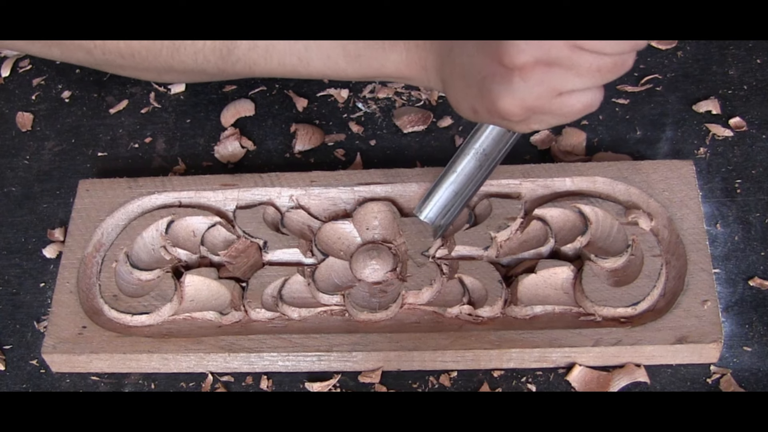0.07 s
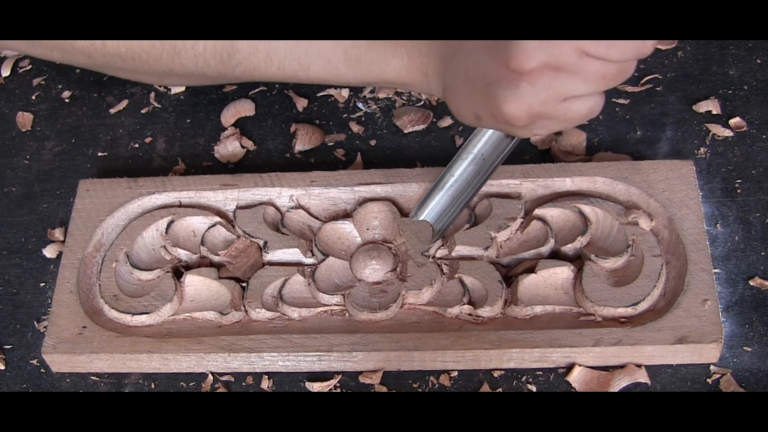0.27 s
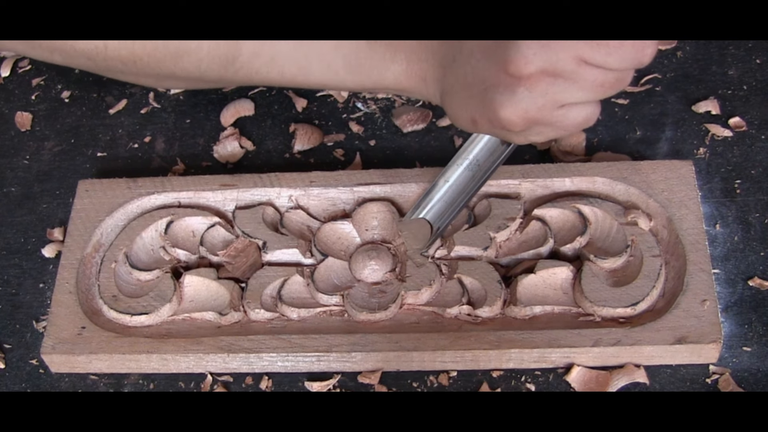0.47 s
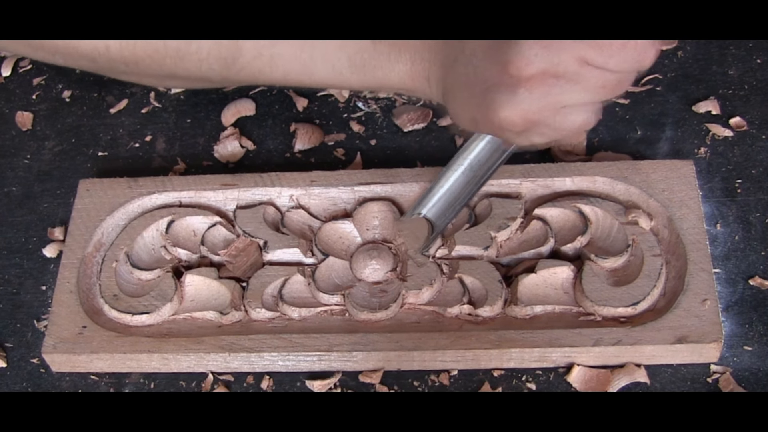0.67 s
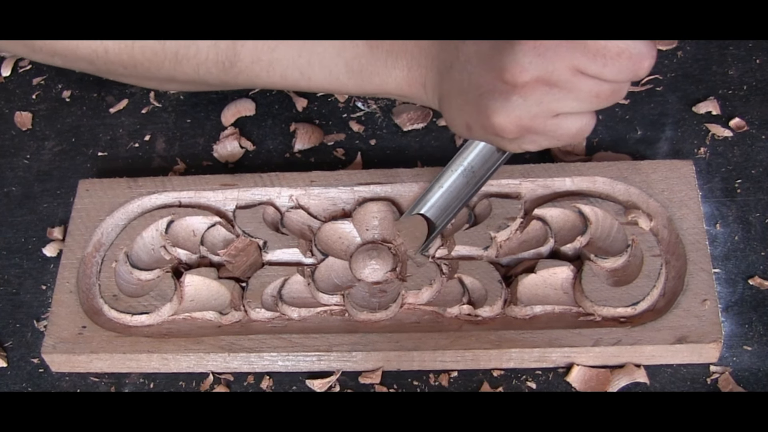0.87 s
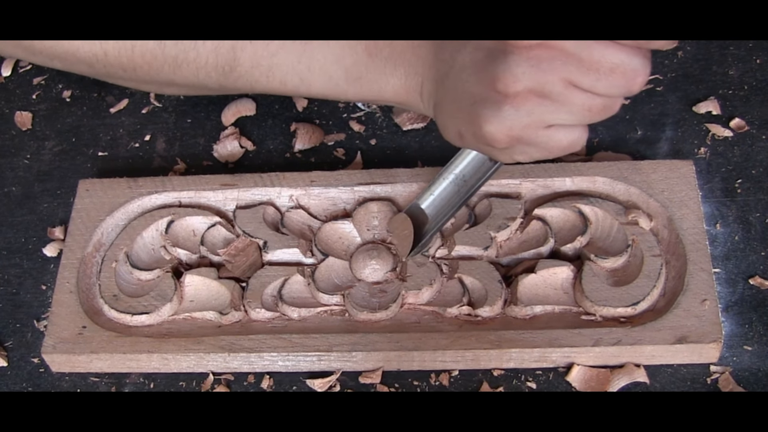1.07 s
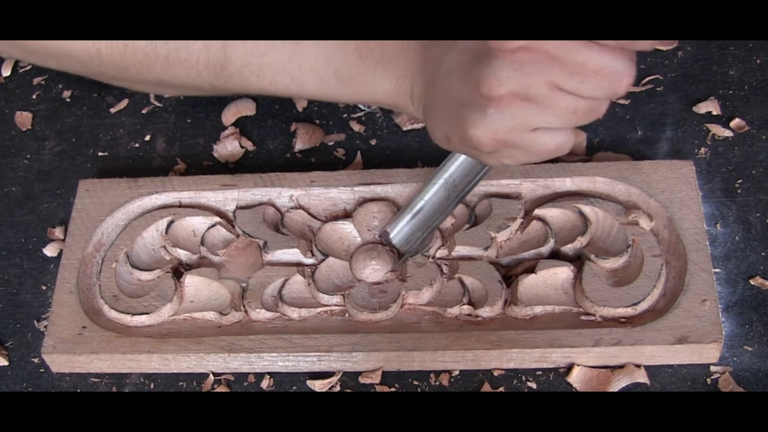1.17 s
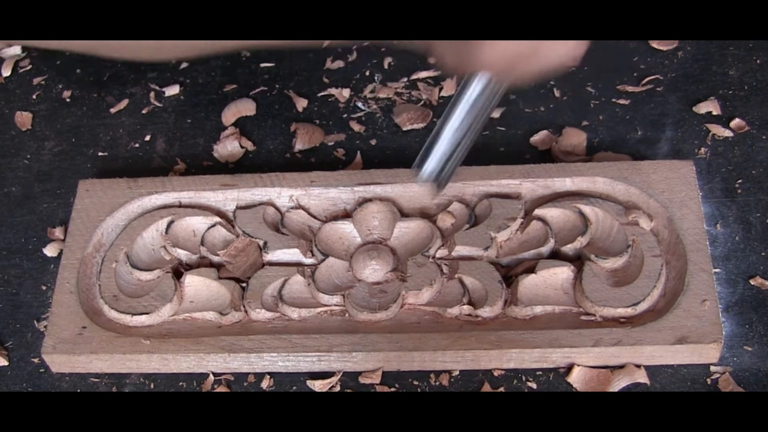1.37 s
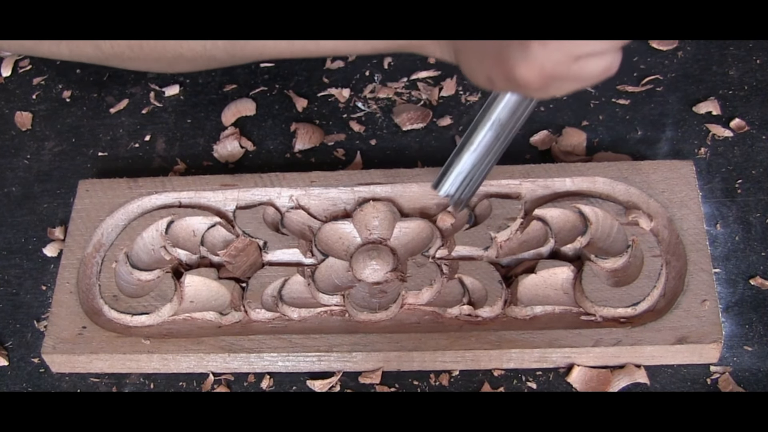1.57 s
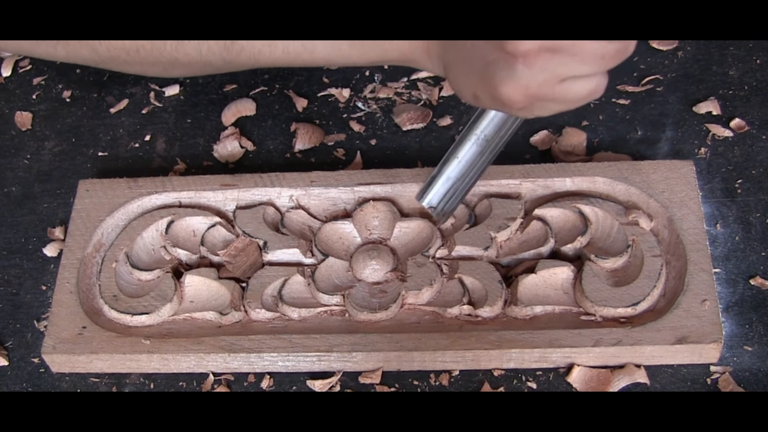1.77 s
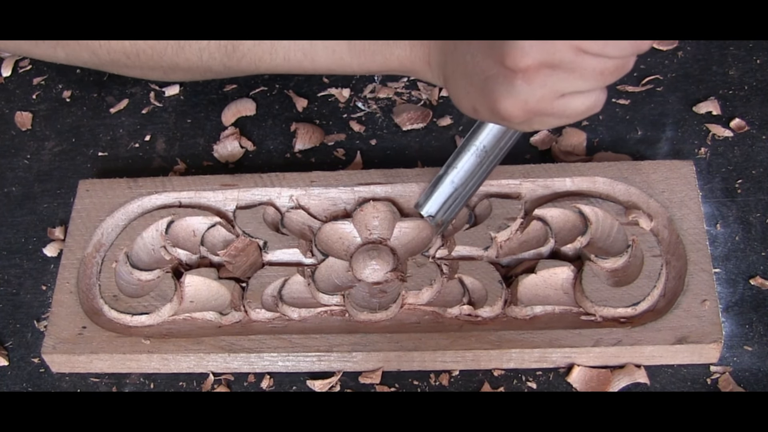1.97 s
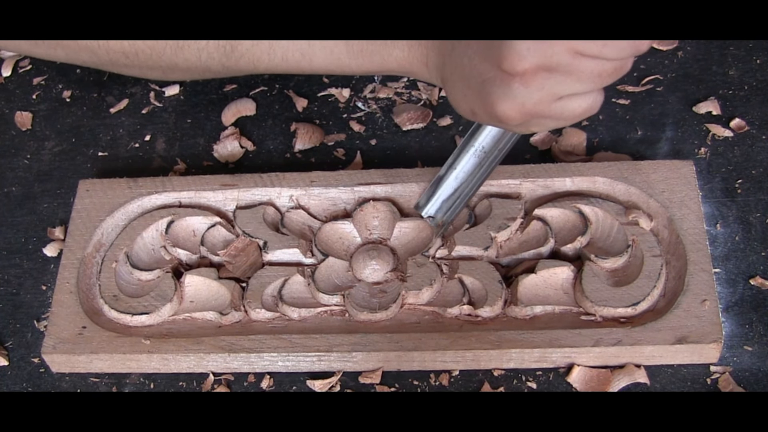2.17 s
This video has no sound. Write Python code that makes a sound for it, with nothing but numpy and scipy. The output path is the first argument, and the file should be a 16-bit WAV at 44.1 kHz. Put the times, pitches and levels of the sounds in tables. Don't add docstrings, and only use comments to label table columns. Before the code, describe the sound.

A wooden mallet knocks a gouge into a hardwood panel five times in a quick even run, close up in a small workshop; then the tool lifts with a crackly tick, sets down softly, and dull nudges follow.

```python
import sys
import numpy as np
from scipy import signal
from scipy.io import wavfile

SR = 44100
rng = np.random.default_rng(int(sys.argv[2]) if len(sys.argv) > 2 else 0)


def materialize(psi):
    bounded = np.clip(np.atleast_2d(psi).T, -1, 1)
    quanta = np.round(bounded * 32767).astype(np.int16)
    wavfile.write(sys.argv[1], SR, quanta)


def gain_from_db(level_db):
    decades = np.asarray(level_db, float) / 20
    return 10 ** decades


N = 97020
LEAD = SR // 4
FACE_LOW_HZ, FACE_TOP_HZ = 175, 4900
ROOM_BUILD_S, ROOM_ALIKE = 0.006, 0.62


def rms_one(x):
    return x / np.sqrt(np.mean(x ** 2) + 1e-20)


def at_hz(points, hz):
    table_hz, values = np.array(points).T
    return np.interp(np.log(hz), np.log(table_hz), values)


def ring(clicks, hz, t60_s):
    r = gain_from_db(-60 / (t60_s * SR))
    w = 2 * np.pi * hz / SR
    return signal.lfilter([0, np.sin(w)], [1, -2 * r * np.cos(w), r * r], clicks + 1e-18)


def band(x, low_hz, high_hz):
    sos = signal.butter(2, [low_hz, min(high_hz, 0.45 * SR)], "band", fs=SR, output="sos")
    return signal.sosfilt(sos, x)


def dying(t60_s, size):
    return gain_from_db(-60 * np.arange(size) / SR / t60_s)


def add(track, s, sound):
    i = int(s * SR) + LEAD
    track[..., i:i + sound.shape[-1]] += sound[..., :track.shape[-1] - i]


def banded(size, gain, alike):
    out = 0
    edges_hz = 28 * 2 ** np.arange(0, 9.6, 0.5)
    white = rng.standard_normal((2, 2, size))
    for k, (low_hz, high_hz) in enumerate(zip(edges_hz, edges_hz[1:])):
        mid, side = band(white[k % 2], low_hz, high_hz)
        hz = np.sqrt(low_hz * high_hz)
        c = np.clip(alike(hz), 0, 1)
        out = out + gain(hz) * (np.sqrt(1 + c) * mid + np.sqrt(1 - c) * side * [[1], [-1]])
    return out


def build_up(size):
    return 1 - np.exp(-(np.arange(size) / SR / ROOM_BUILD_S) ** 2)


def struck(modes, size=SR // 4):
    click = np.arange(size) == 0
    return sum(gain_from_db(db) * ring(click, hz, t60_s) for hz, db, t60_s in modes)


def tilt(hz, bass_db, treble_db):
    return at_hz([(500, bass_db), (1200, 0), (2500, 0), (4000, treble_db)], hz)


# start in seconds, peak in dB, bass tilt in dB, treble tilt in dB, late echo in dB.
BLOWS = [
    (0.2308, 1, -3, -4.5, -37.5),
    (.4903, 3, -3.5, 3, -24),
    (0.7174, 1.5, -6.5, 9.5, -15),
    (0.9471, 1, -4, 7.5, -18),
    (1.1670, 1, 4, -0.5, -38),
]
# start in seconds, peak, bass tilt, treble tilt, late echo in dB.
EARLIER_BLOW = (-.09, -4.5, 0, 11, -37)
ALL_BLOWS = [EARLIER_BLOW] + BLOWS
# frequency in Hz, level in dB, t60 in seconds.
WOOD = [(172, -37, 0.094), (285, -32.5, .05), (401.2, -21.5, 0.088), (560, -21.5, .04), (798, -16, .03),
        (993, -17.5, 0.034), (1116, -15, .03), (1358, -14, 0.066), (1711, -16.5, 0.026),
        (1963, -12.5, .025), (2346, -6.5, 0.019), (2826, -16, 0.013), (3738, -19.5, 0.013),
        (3297, -19, 0.013)]
# frequency in Hz, level in dB, t60 in seconds.
SHANK = [(200.4, -35.5, 0.55), (418, -34.5, 0.3), (573, -36, .25), (1135, -35, 0.27), (1727, -40, .25),
         (2458, -39, .25), (4330, -50.5, 0.11), (6500, -63, .15)]
CONTACTS_S = (0, .0011, .0024, .0042)
CONTACTS_DB = (-2.5, -3, -5.5, -12)
MODE_SPREAD_DB, DETUNE = 2.5, 0.025
CRACK_DB, CRACK_T60_S, CRACK_LOW_HZ, CRACK_TOP_HZ = -26, 0.012, 4434, 11000
BENCH_HZ, BENCH_DB, BENCH_T60_S = 80, -45, 0.55


def mallet():
    out, size = np.zeros(N + LEAD), SR // 2
    t = np.arange(size) / SR
    contacts = (np.array(CONTACTS_S) * SR).astype(int)
    for s, db, bass_db, treble_db, _ in ALL_BLOWS:
        luck = rng.standard_normal((len(WOOD), len(CONTACTS_S) + 1))
        crack = dying(CRACK_T60_S, size) * band(rng.standard_normal(size), CRACK_LOW_HZ, CRACK_TOP_HZ)
        crack = gain_from_db(CRACK_DB + treble_db) * crack
        body = 0
        for (hz, mode_db, t60_s), (bend, *push) in zip(WOOD, luck):
            clicks = np.zeros(size)
            clicks[contacts] = gain_from_db(np.add(CONTACTS_DB, MODE_SPREAD_DB * np.array(push)))
            mode = ring(clicks, hz * (1 + DETUNE * bend), t60_s)
            body = body + gain_from_db(mode_db + tilt(hz, bass_db, treble_db)) * mode
        for hz, ring_db, t60_s in SHANK:
            linger = dying(t60_s, size) * ring(rng.standard_normal(size), hz, 0.078)
            body = body + gain_from_db(ring_db - 20 + 2.6 * rng.standard_normal()) * linger
        body = band(band(body, FACE_LOW_HZ, FACE_TOP_HZ), FACE_LOW_HZ, 2 * FACE_TOP_HZ)
        swell = 1 - np.exp(-t / 0.02)
        thud = gain_from_db(BENCH_DB) * swell * struck([(BENCH_HZ, 0, BENCH_T60_S)], size)
        add(out, s, gain_from_db(db) * (body + crack + thud))
    return out


# high mode in Hz, its level in dB, low mode in Hz, its level in dB.
BITES = [(2270, -16, 1130, -20), (2206, -7.5, 1179, -12.5), (2282, -9, 1150, -16), (3826, -10, 1500, -14.5),
         (3684, -11, 770, -22.5), (3027, -9.5, 330, -20.5)]
# start in seconds,
# frequency in Hz, level in dB, t60 in seconds.
SINGLE_RINGS = [(1.168, 557, -10.5, 0.04), (1.1675, 2100, -15, .025), (.9475, 3200, -19.5, 0.016),
                (0.87, 4550, -53, .15), (0.79, 4000, -50, .15), (1.2, 2230, -36.5, .02),
                (1.654, 2200, -53.5, .08), (1.6392, 2700, -43, 0.017), (1.6394, 5000, -36, 0.011),
                (1.643, 3105, -46, 0.034), (1.732, 1950, -61, 0.09)]
BITE_HIGH_T60_S, BITE_LOW_T60_S = 0.035, 0.058


def bites():
    out = np.zeros(N + LEAD)
    for (s, *_), (high_hz, high_db, low_hz, low_db) in zip(ALL_BLOWS, BITES):
        pair = struck([(high_hz, high_db, BITE_HIGH_T60_S), (low_hz, low_db, BITE_LOW_T60_S)])
        add(out, s + 0.0004, band(band(pair, FACE_LOW_HZ, FACE_TOP_HZ), FACE_LOW_HZ, FACE_TOP_HZ))
    for s, hz, db, t60_s in SINGLE_RINGS:
        add(out, s, band(struck([(hz, db, t60_s)]), hz / 2, hz * 2))
    return out


# frequency in Hz, t60 in seconds.
ROOM_T60 = [(60, .5), (160, 0.33), (420, 0.2384), (1100, 0.1721), (2900, 0.1551), (7700, .085)]
# frequency in Hz, level in dB.
ROOM_COLOUR = [(50, -22.5), (120, -12), (330, -13.5), (600, 1), (1300, 5.5), (2600, -4.5), (5000, -23),
               (14000, -62)]
# level in dB, treble tilt in dB.
ECHOES = [(2, 3.5), (0.5, -5.5), (-2.5, 2.5), (-1, 1.5), (-4.5, 3.5), (-6, 2)]
ROOM_DB, LATE_STRETCH = -16.5, 2.5
RECOVER_DB, RECOVER_S = 14.5, 0.087


def blow_tails():
    out, size = np.zeros((2, N + LEAD)), SR // 2
    t = np.arange(size) / SR
    recover = gain_from_db(RECOVER_DB * np.minimum(t / RECOVER_S, 1))
    for (s, db, bass_db, _, late_db), (room_db, treble_db) in zip(ALL_BLOWS, ECHOES):
        def gain(hz):
            t60_s = at_hz(ROOM_T60, hz)
            fall = recover * dying(t60_s, size) + gain_from_db(late_db) * dying(LATE_STRETCH * t60_s, size)
            return gain_from_db(at_hz(ROOM_COLOUR, hz) + tilt(hz, bass_db, treble_db)) * fall
        echoes = build_up(size) * banded(size, gain, lambda hz: ROOM_ALIKE)
        add(out, s, gain_from_db(db + room_db + ROOM_DB) * echoes)
    return out


# frequency in Hz, density in dB per Hz.
HUM = [(18, -40), (30, -14.5), (118, -1.5), (233, -4), (437, -7), (988, -10), (1160, -14), (1720, -13.5),
       (16000, -33)]
# frequency in Hz, left-right likeness from 0 to 1.
HUM_ALIKE = [(60, 0.56), (380, 0.77), (2380, 0.05), (15000, -0.01)]
HUM_DB = -61.5
BUMP_HZ, BUMP_T60_S, BUMP_DB = 209.4, 0.017, -69


def hum():
    size = N + LEAD
    bump = rms_one(band(ring(rng.standard_normal(size), BUMP_HZ, BUMP_T60_S), 120, 300))
    air = rms_one(banded(size, lambda hz: gain_from_db(at_hz(HUM, hz)), lambda hz: at_hz(HUM_ALIKE, hz)))
    return gain_from_db(BUMP_DB) * bump + gain_from_db(HUM_DB) * air


# start in seconds, steel in dB, wood knock in dB, fibre crackle in dB.
TICKS = [
    (1.3391, -27, -36.5, -23.5),
    (1.6397, -60, -57, -27),
]
# frequency in Hz, level in dB, t60 in seconds.
STEEL = [(3943, -3, 0.028), (5830, -6, 0.0097), (8500, -0.5, 0.002), (11160, -1, 0.0023)]
# frequency in Hz, level in dB, t60 in seconds.
KNOCK = [(446, 0.5, 0.025), (592, 6.5, 0.024), (1310, 5.5, 0.0093)]
CRACKLE_PER_S, CRACKLE_T60_S, CRACKLE_LOW_HZ, CRACKLE_TOP_HZ = 2100, 0.09, 2160, 5900


def gouge():
    out, size = np.zeros(N + LEAD), SR // 8
    for s, steel_db, knock_db, crackle_db in TICKS:
        snaps = (rng.random(size) < CRACKLE_PER_S / SR) * rng.laplace(0, 1, size)
        snaps = snaps * dying(CRACKLE_T60_S, size)
        crackle = band(snaps, CRACKLE_LOW_HZ, CRACKLE_TOP_HZ) + 0.18 * band(snaps, CRACKLE_TOP_HZ, 18000)
        add(out, s, gain_from_db(steel_db) * struck(STEEL))
        add(out, s + 0.00193, gain_from_db(knock_db) * band(struck(KNOCK), 314, 2700))
        add(out, s, gain_from_db(crackle_db - 3) * crackle)
    return out


# start in seconds, level in dB.
SNAPS = [
    (1.6392, -33),
    (1.6428, -35.5),
    (1.3392, -30),
    (2.1, -60),
]
SNAP_T60_S, SNAP_LOW_HZ, SNAP_TOP_HZ = 0.01, 1430, 8600


def fibres():
    out, size = np.zeros(N + LEAD), SR // 20
    for s, db in SNAPS:
        snap = band(rng.standard_normal(size), SNAP_LOW_HZ, SNAP_TOP_HZ)
        add(out, s, gain_from_db(db) * dying(SNAP_T60_S, size) * snap)
    return out


# frequency in Hz, t60 in seconds.
TICK_T60 = [(200, 0.33), (3000, 0.12), (10000, 0.045)]
TICK_ROOM_DB = -35


def small_tails(x):
    size = SR // 4
    echoes = banded(size, lambda hz: dying(at_hz(TICK_T60, hz), size), lambda hz: ROOM_ALIKE)
    echoes = echoes * build_up(size)
    return gain_from_db(TICK_ROOM_DB) * signal.fftconvolve(x[None], echoes, axes=1)[:, :len(x)]


# start in seconds, level in dB.
NUDGES = [
    (1.957, -46),
    (2.137, -49),
    (5.3, -54.5),
]
# frequency in Hz, level in dB, t60 in seconds.
NUDGE = [(215, 1, 0.049), (131.9, -13, 0.088), (452, -6, 0.034)]


def hand():
    out = np.zeros(N + LEAD)
    for s, db in NUDGES:
        add(out, s, gain_from_db(db) * band(struck(NUDGE), 120, 900))
    return out


PAN_DB, SIDE_LAG_S = -0.16, 0.000005


def scene():
    small = gouge() + fibres() + hand()
    near = mallet() + bites() + small
    n = np.arange(N + LEAD)
    left = np.interp(n - SIDE_LAG_S * SR, n, near) * gain_from_db(PAN_DB / 2)
    right = near * gain_from_db(-PAN_DB / 2)
    return (np.array([left, right]) + blow_tails() + small_tails(small) + hum())[:, LEAD:]


# frequency in Hz, level in dB.
SMEAR_DB = [(200, -25.5), (800, -21.5), (1500, -12), (2500, -6), (4000, -7.5), (6000, -9), (10000, -13.5)]
SMEAR_LOUD = 0.12


def smear(x):
    hz, _, frames = signal.stft(x, SR, nperseg=1536, noverlap=1152)
    power = np.mean(np.abs(frames) ** 2, axis=(0, 1))
    coarse = (power / power.max()) ** (SMEAR_LOUD / 2) * gain_from_db(at_hz(SMEAR_DB, hz + 1) + 8)[:, None]
    frames = frames * np.exp(2j * np.pi * rng.random(frames.shape)) * coarse
    return signal.istft(frames, SR, nperseg=1536, noverlap=1152)[1][:, :N]


def band_limit(x):
    return signal.sosfilt(signal.butter(12, 16630, fs=SR, output="sos"), x)


TOP, CUTOFF_HZ = 0.92, 16300


def record(dry):
    x = TOP * np.tanh(dry / TOP)
    low_pass = signal.cheby2(12, 60, CUTOFF_HZ, fs=SR, output="sos")
    mix = signal.sosfilt(low_pass, x + smear(x))
    return band_limit(mix)


dry = scene()
out = record(dry)
materialize(out)
```